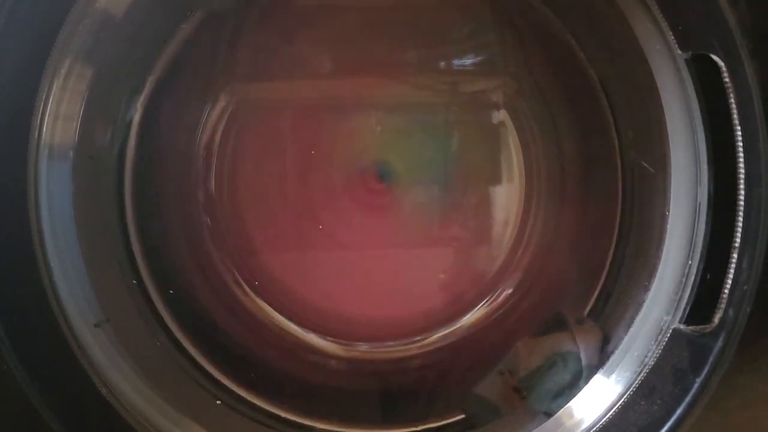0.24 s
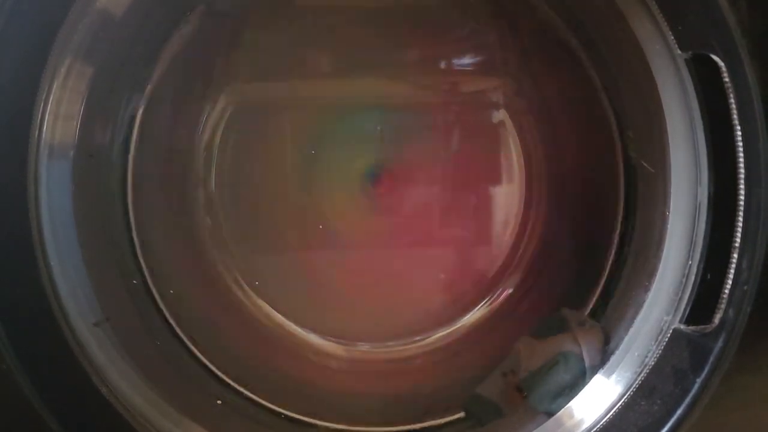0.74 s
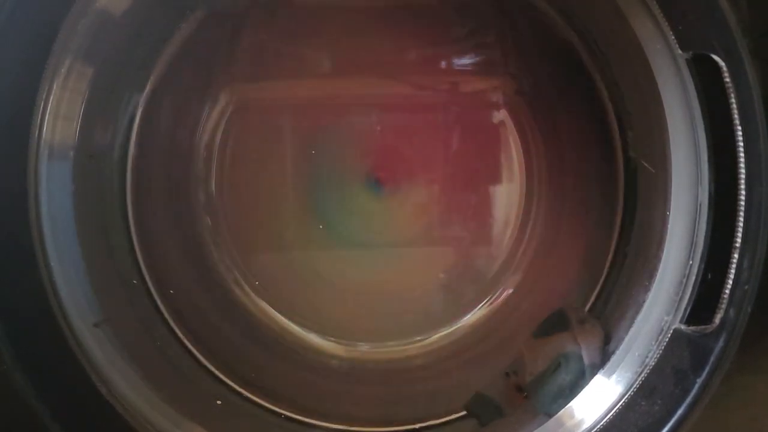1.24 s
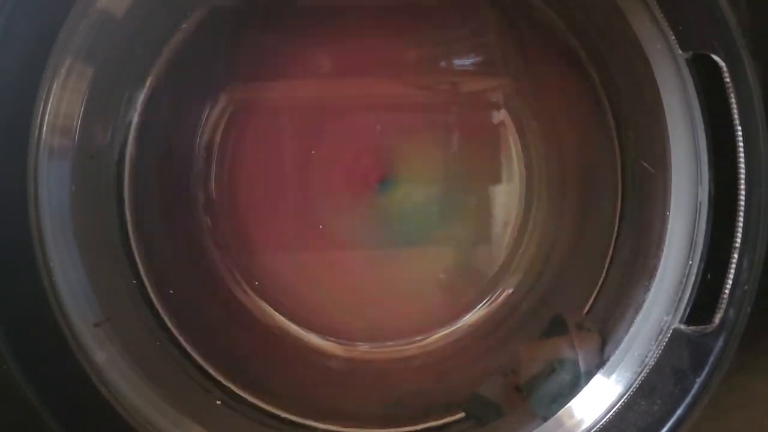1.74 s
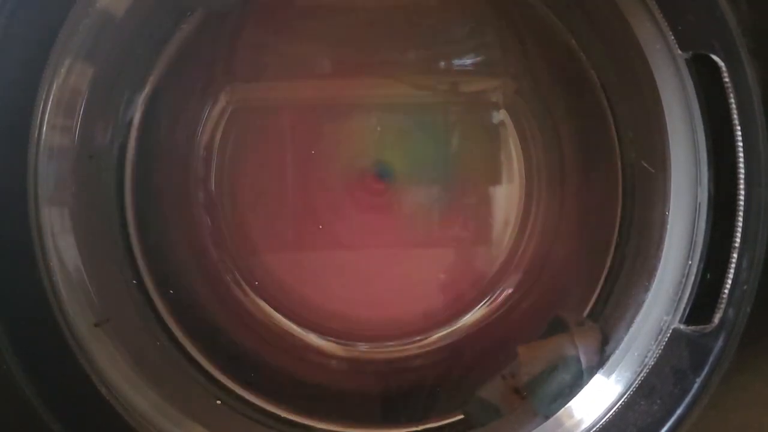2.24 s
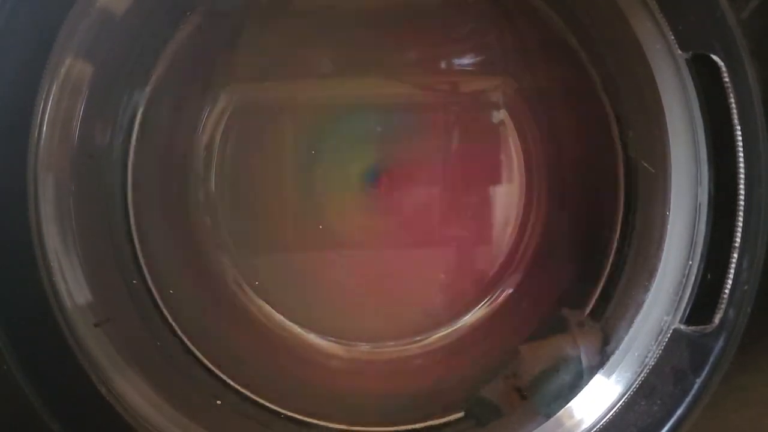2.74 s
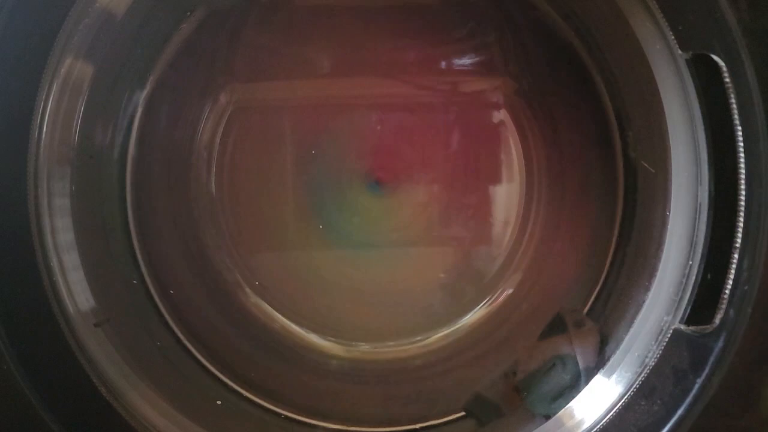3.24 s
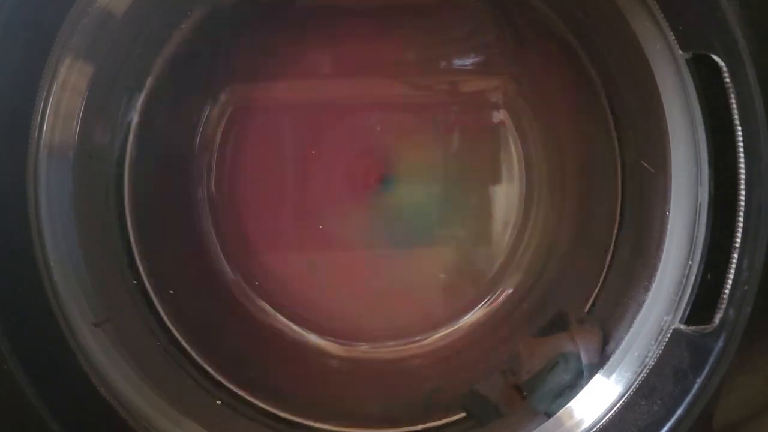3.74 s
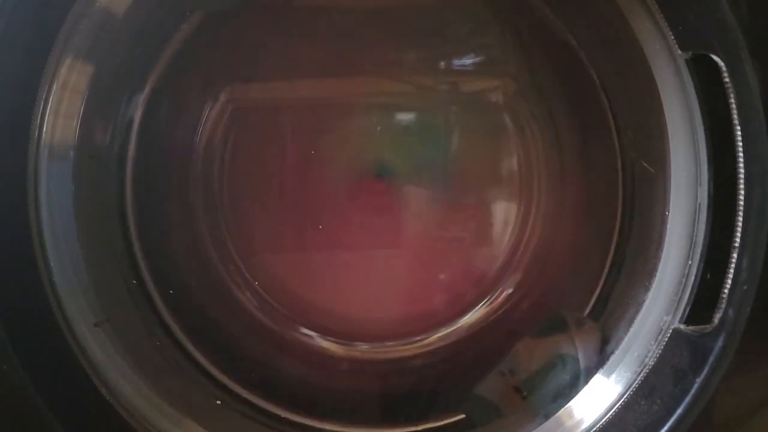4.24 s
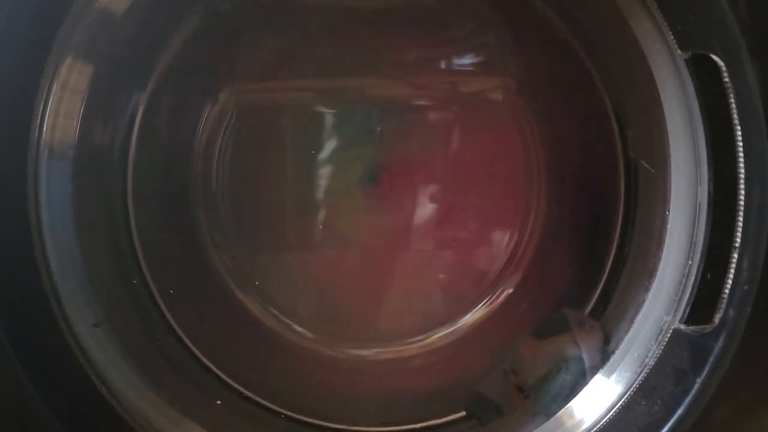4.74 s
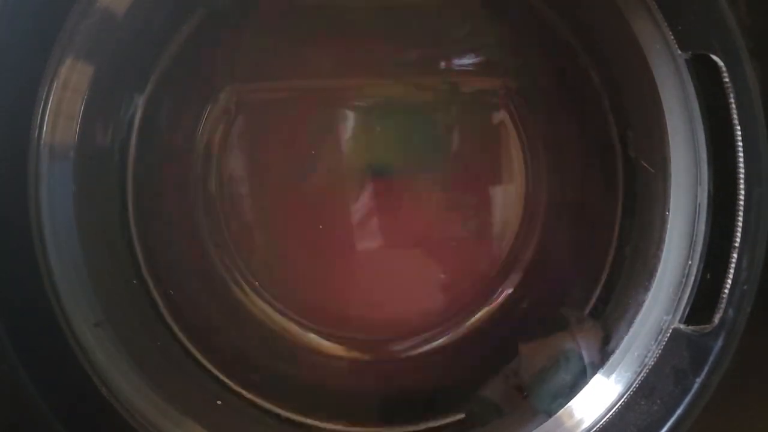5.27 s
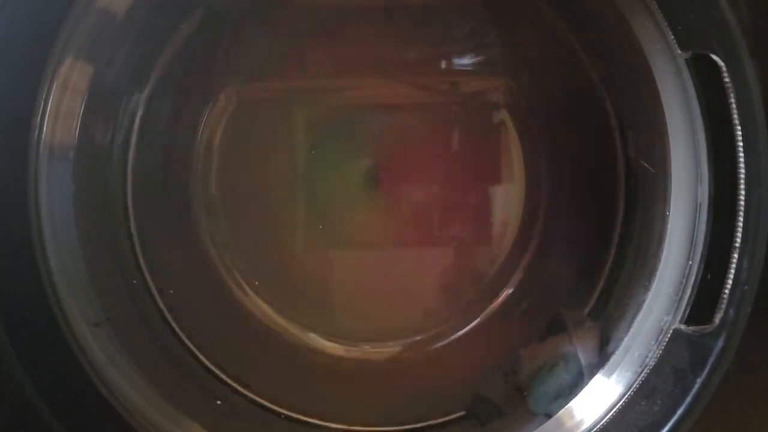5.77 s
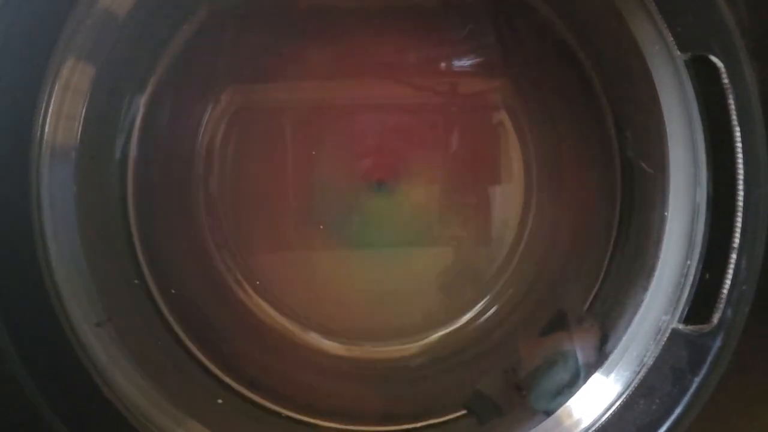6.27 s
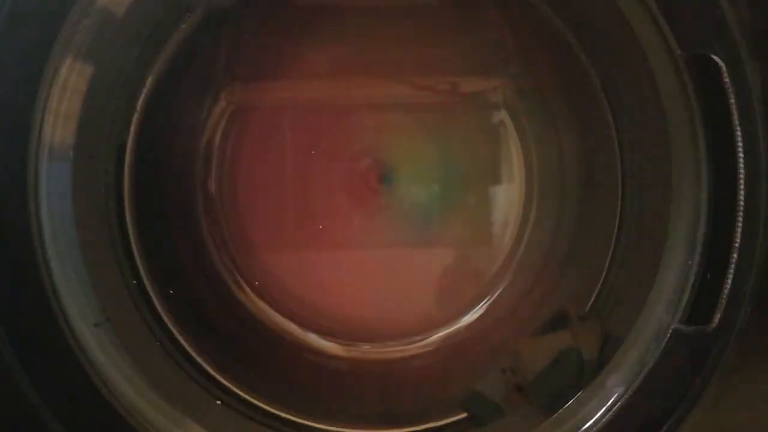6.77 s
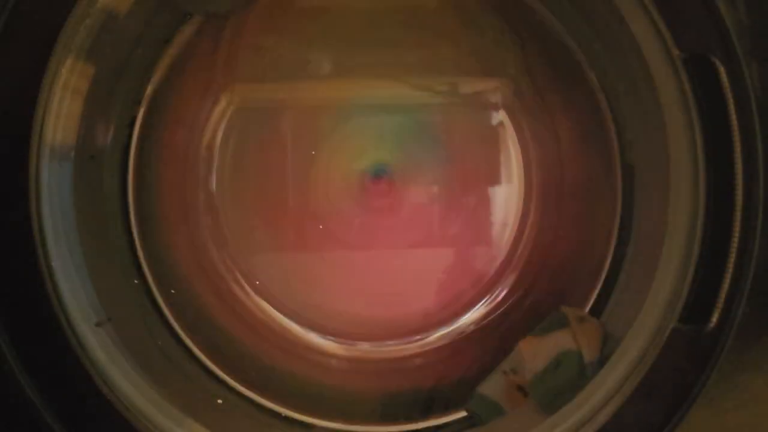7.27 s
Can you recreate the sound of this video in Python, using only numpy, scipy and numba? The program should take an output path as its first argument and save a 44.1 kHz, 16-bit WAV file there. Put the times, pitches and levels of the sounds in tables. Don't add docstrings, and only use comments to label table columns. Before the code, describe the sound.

Close steady drone of a washing machine's fast spin, a deep dominant hum with rushing tub noise, thin high whine and soft fan hiss.

```python
import sys
import numpy as np
from scipy import signal
from scipy.fft import irfft, next_fast_len
from scipy.io import wavfile
from numba import njit

SR = 44100
rng = np.random.default_rng(int(sys.argv[2]) if len(sys.argv) > 2 else 0)


def transcribe(signal):
    frames = np.atleast_2d(signal).T
    limited = np.clip(frames, -1, 1)
    pcm = np.round(limited * 32767).astype(np.int16)
    wavfile.write(sys.argv[1], SR, pcm)


def boost(x):
    u = np.asarray(x, float) / 20
    return 10 ** u


N = 331191
HOP = 128

# t/s, f/Hz
MOTOR_SPEED = [
    (0.0, 192.575),
    (1.2, 192.548),
    (2.2, 192.484),
    (3.25, 192.53),
    (3.75, 192.546),
    (4.5, 192.545),
    (5.5, 192.573),
    (7.51, 192.584),
]
# t/s, nearness level/dB
NEARNESS = [
    (0.0, 0.0),
    (1.7, 0.65),
    (2.5, 0.76),
    (3.75, 0.36),
    (4.4, 0.0),
    (5.3, -0.34),
    (6.2, -0.4),
    (7.51, -0.66),
]
# drum order [1], left level/dB, right level/dB
CABINET_ORDERS = [(1, -48.3, -50.3), (2, -39.3, -40.3), (3, -34.8, -37.2), (4, -33.7, -34.2),
                  (5, -35.6, -35.0), (6, -29.6, -31.2), (7, -12.8, -14.7), (8, -36.4, -38.2),
                  (9, -31.2, -31.4), (10, -43.9, -45.2), (11, -39.4, -42.5), (13, -40.4, -43.4),
                  (19, -40.7, -41.2), (23, -42.6, -41.2)]
# multiple [1], drum sideband [1], left level/dB, right level/dB
INNER_RACE = [(5, 0, -40, -42), (11, 0, -31, -37), (12, 1, -34, -46), (13, -2, -35, -39),
              (13, -1, -36, -40), (13, 0, -34, -29), (14, -1, -37, -41), (14, 0, -37, -36),
              (15, -1, -38, -41), (15, 0, -34, -37), (15, 1, -39, -43), (16, 0, -38, -42),
              (16, 1, -37, -46), (17, 0, -34, -41), (17, 1, -38, -35), (11, -2, -40, -46),
              (12, -1, -41, -56), (21, 0, -44, -50), (21, 1, -45, -47), (22, 1, -45, -46)]
# multiple [1], drum sideband [1], left level/dB, right level/dB
OUTER_RACE = [(17, -2, -38, -43), (17, 2, -37, -48), (18, 1, -41, -42), (20, -2, -36, -50),
              (20, 0, -43, -39), (22, -1, -34, -32), (22, 0, -45, -34), (25, -2, -39, -40),
              (25, 0, -33, -40), (30, -2, -44, -42), (30, 0, -41, -48), (31, -1, -43, -41),
              (31, 0, -38, -42), (33, -1, -44, -45)]
# f/Hz, left level/dB, right level/dB
STEADY_TONES = [(200.0, -44, -46), (300.0, -47, -51), (350.0, -47, -46), (358.0, -45, -46),
                (450.0, -47, -49), (776.0, -44, -45), (792.5, -44, -46), (835.5, -41, -48),
                (852.0, -39, -41), (890.0, -33, -34), (911.5, -47, -41), (1091.0, -40, -38),
                (1150.5, -44, -40), (1262.5, -47, -41)]
# motor order [1], left level/dB, right level/dB
SHAFT_ORDERS = [(15, -48, -49), (18, -40, -39), (20, -45, -51), (22, -49, -61), (26, -50, -59),
                (32, -53, -60), (33, -51, -55), (34, -46, -56), (35, -52, -57), (36, -37, -41),
                (37, -46, -52), (38, -52, -46), (39, -52, -56), (40, -53, -56), (41, -51, -50),
                (44, -49, -55), (54, -42, -36), (55, -52, -53), (59, -53, -51), (62, -53, -51),
                (63, -50, -54), (64, -49, -57), (72, -39, -47)]
# left and right follow of nearness [dB per dB], sway level/dB, sway period [s], a sway top t/s
SLOT_SWAY = [
    (0.0, -2.0, 3.2, .93, 4.8),
    (1.2, 1.0, 1.5, 2.3, 6.2),
    (1.2, 3.0, 1.2, 1.6, 3.9),
    (1.5, 2.0, 1.5, 2.9, 6.4),
]
# lower level/dB, lower drum angle [rad], upper level/dB, upper drum angle [rad]
SLOT_SIDEBANDS = [
    [(-6, -2.0, -8, -1.5), (-16, -1.9, -11, -.1)],
    [(-16, -1.0, -7, 2.6), (-5, 1.5, -5, 2.1)],
    [(4, 2.2, 6, -.9), (-12, 2.1, -8, 2.2)],
    [(9, -2.1, 0, 2.9), (-6, -1.9, -5, .6)],
]
SLOT_PHASE_LEAD = [.8, .4, -1.5, -1.4]
# f/Hz, level/dB per Hz
ROAR_SPECTRUM = [(5, -95), (22, -79), (45, -67), (110, -61), (220, -64.5), (350, -59.5), (550, -65),
                 (800, -57), (1200, -55), (1520, -60), (1600, -60.5), (2050, -64), (2400, -68.5),
                 (3300, -68.5), (4200, -83)]
# f/Hz, level/dB per Hz
HISS_SPECTRUM = [(3000, -109), (4200, -77), (5000, -78), (6500, -81), (7000, -75.5), (8000, -83),
                 (9500, -83), (10400, -81), (11000, -80), (13000, -81), (14000, -84), (14600, -82),
                 (16000, -80)]
# f/Hz, width [Hz], level/dB per Hz, left minus right level/dB
TUB_RESONANCES = [(268.5, 25, -56, -0.5), (445, 22, -54.5, -1), (616.6, 46, -57, 0),
                  (973.7, 32, -44.5, 7.5), (1044, 65, -55, -12.5), (1134, 67, -51, 7),
                  (1303, 54, -48.5, -1), (1414, 22, -59.5, 20), (1494, 46, -48.5, -1), (1848, 85, -58, 10),
                  (1970, 24, -55, -2), (2182, 130, -57.5, -1.5), (2548, 52, -60, 7), (2910, 43, -67, 2)]
# f/Hz, correlation [1]
PORT_LIKENESS = [(60, 0.68), (200, 0.87), (400, 0.92), (800, 0.48), (1500, 0.91), (3000, 0.35),
                 (8000, 0.23)]
# f/Hz, level/dB
PORT_LEAN = [(60, -1), (400, 4), (1000, 1.5), (3000, 1.8), (5000, 0), (8500, 14), (10500, -6), (12000, 5),
             (15000, 14)]

BELT_RATIO, START_ANGLE = 11.6555, -.263
BALLS, INNER_PER_TURN = 9, 5.3718
EDGE_HZ, RIGHT_LAG = 15725, 3
HUM_FOLLOW, ROAR_FOLLOW, HISS_FOLLOW, THROB_FOLLOW = 0.64, 0.68, 1.7, 1.8
BEAT_DB, BEAT_S, BEAT_TOP_S = 0.33, 1.07, .7
SHADE_S, SHADE_WIDTH_S, SHADE_DB = 4.85, .4, -1.4
HISS_SWELL_S, HISS_SWELL_WIDTH_S, HISS_SWELL_DB = 5.5, .35, 1
DRUM_DB, DRUM_FALL_DB, DRUM_SCATTER_DB = -44, -.45, 2.5
FAINT_DB, FAINT_SCATTER_DB = -49, 2.0
SHAFT_DB, SHAFT_FALL_DB, SHAFT_SCATTER_DB = (-54.5, -57.5), -.05, 2.5
TREMBLE_HZ, TREMBLE_S, TREMBLE_GROW_S = 3.2, 3.2, .6
CALM, SHAKEN = .06, .24


def read(points, hz):
    f, value = np.transpose(points)
    return np.interp(np.log(hz + 1), np.log(f + 1), value)


def nearness(t):
    return np.interp(t, *np.transpose(NEARNESS))


def tub_load(t):
    shade_db = SHADE_DB * np.exp(-((t - SHADE_S) / SHADE_WIDTH_S) ** 2)
    return boost(ROAR_FOLLOW * nearness(t) + shade_db)


def wander(count, width_hz):
    frames = N // HOP + 2
    z = rng.standard_normal((count, 2, frames)) + 1j * rng.standard_normal((count, 2, frames))
    hz = np.fft.fftfreq(frames, HOP / SR)
    z = np.fft.ifft(np.fft.fft(z) / (1 + (hz / width_hz) ** 2))
    return z / np.sqrt(np.mean(abs(z) ** 2, -1, keepdims=True))


@njit
def tones(angle, size, hop):
    out = np.zeros((2, hop * angle.shape[1]))
    for k in range(angle.shape[0]):
        for f in range(angle.shape[1] - 1):
            now = np.exp(1j * angle[k, f])
            step = np.exp(1j * (angle[k, f + 1] - angle[k, f]) / hop)
            for i in range(hop):
                for c in range(2):
                    change = size[k, c, f + 1] - size[k, c, f]
                    out[c, f * hop + i] += (now * (size[k, c, f] + change * i / hop)).real
                now *= step
    return out


def sing(angle, db, shape):
    return tones(angle, np.sqrt(2) * boost(db)[:, :, None] * shape, HOP)[:, :N]


def unsteady(hz, share, width_hz, spread=2.5):
    apart = np.minimum(hz / 900, spread)[:, None, None] * rng.standard_normal((len(hz), 2, 1))
    path = np.exp(1j * (2 * np.pi * rng.random((len(hz), 1, 1)) + apart))
    share = np.clip(share, 0, 1)
    return path * (np.sqrt(1 - share) + np.sqrt(share) * wander(count=len(hz), width_hz=width_hz))


def orders(first, last, strong, rule_db, scatter_db):
    order = np.arange(first, last + 1.)
    db = rule_db(order) + scatter_db * np.clip(rng.standard_normal((len(order), 2)), -2, 1)
    for k, *ports in strong:
        db[order == k] = ports
    return order, *db.T


def noise(power, hz):
    a, b, c, d = rng.standard_normal((len(hz), 4)).T
    same = np.clip(read(PORT_LIKENESS, hz), -1, 1)
    left = a + 1j * b
    right = same * left + np.sqrt(1 - same ** 2) * (c + 1j * d)
    size = 2 * len(hz) - 2
    return irfft(np.array([left, right]) * np.sqrt(power * SR * size / 4), size)[:, :N]


def tub_roar(t, drum):
    hz = np.fft.rfftfreq(next_fast_len(N // 2 + 1) * 2, 1 / SR)
    time = np.arange(N) / SR
    drum_angle = np.interp(time, t, drum)
    lean = boost(np.outer([.5, -.5], read(PORT_LEAN, hz))) ** 2

    high_fall_db = 40 * np.log2(np.maximum(hz / 4200, 1))
    body = boost(read(ROAR_SPECTRUM, hz) - high_fall_db) ** 2 * lean
    for f, width, db, lean_db in TUB_RESONANCES:
        peak = boost(db + np.array([[.5], [-.5]]) * lean_db) ** 2
        body = body + peak / (1 + (2 * (hz - f) / width) ** 2) ** 2
    roar = noise(body, hz) * tub_load(time) * (1 + .1 * np.cos(drum_angle - 2.1))

    air = boost(read(HISS_SPECTRUM, hz)) ** 2 * lean * (hz > 3000)
    hiss = noise(air, hz) * (1 + 0.076 * np.cos(drum_angle + 3.0))
    gusts_db = 1.2 * wander(count=1, width_hz=4.5)[0].real
    swell_db = HISS_SWELL_DB * np.exp(-((t - HISS_SWELL_S) / HISS_SWELL_WIDTH_S) ** 2)
    gusts_db = gusts_db + HISS_FOLLOW * nearness(t) + swell_db
    hiss = hiss * boost([np.interp(time, t, g) for g in gusts_db])
    return boost(2.5) * roar + boost(0.5) * hiss


def bearings(t, drum):
    rows = np.array(INNER_RACE + OUTER_RACE, float)
    per_turn = np.repeat([INNER_PER_TURN, BALLS - INNER_PER_TURN], [len(INNER_RACE), len(OUTER_RACE)])
    faint = rows - [0.031, 2, 0, 0]
    faint[:, 2:] = FAINT_DB + FAINT_SCATTER_DB * rng.standard_normal((len(rows), 2))
    rows, per_turn = np.vstack([rows, faint]), np.tile(per_turn, 2)
    passes = (rows[:, 0] * per_turn + rows[:, 1])[:, None] * drum
    steady = np.array(STEADY_TONES)
    angle = np.vstack([passes, 2 * np.pi * steady[:, :1] * t])
    db = np.vstack([rows[:, 2:], steady[:, 1:]])
    hz = (angle[:, -1] - angle[:, 0]) / (2 * np.pi * t[-1])
    return sing(angle, db, tub_load(t) * unsteady(hz, share=.2, width_hz=.9, spread=.6))


def motor_whine(t, motor, drum):
    def rule_db(k):
        return np.add(SHAFT_DB, SHAFT_FALL_DB * (k[:, None] - 14))

    order, *db = orders(14, 81, SHAFT_ORDERS, rule_db, SHAFT_SCATTER_DB)
    full_hz = MOTOR_SPEED[0][1]
    hz, turn = order * full_hz, np.exp(1j * drum)
    chance = np.exp(2j * np.pi * rng.random((6, len(order), 2, 1)))
    swing = (.011 * order)[:, None, None]
    near = swing * (chance[0] / turn + chance[1] * turn)
    far = 0.26 * swing * (chance[2] / turn ** 2 + chance[3] * turn ** 2)
    far = far + 0.13 * swing * (chance[4] / turn ** 3 + chance[5] * turn ** 3)

    swell = np.ones(near.shape, complex)
    tremble = CALM + (SHAKEN - CALM) / (1 + np.exp((TREMBLE_S - t) / TREMBLE_GROW_S))
    slots = zip((18, 36, 54, 72), SLOT_SWAY, SLOT_SIDEBANDS, SLOT_PHASE_LEAD)
    for k, (*follow, sway_db, period, top), ports, lead in slots:
        sway = sway_db * tremble / SHAKEN * np.cos(2 * np.pi * (t - top) / period)
        level_db = np.outer(follow, nearness(t)) + sway
        below_db, below, above_db, above = np.transpose(ports)[:, :, None]
        lower = boost(below_db) * np.exp(1j * below) / turn
        upper = boost(above_db) * np.exp(1j * above) * turn
        near[order == k] = lower + upper
        lag_phase = 2 * np.pi * k * full_hz * RIGHT_LAG / SR
        swell[order == k] = boost(level_db) * np.exp(1j * np.array([[lead], [lag_phase]]))

    depth = boost(THROB_FOLLOW * nearness(t)) * (.95 + .25 * wander(count=len(hz), width_hz=1.5))
    throb = 1 + (near + far) * depth
    throb = throb / np.sqrt(np.mean(abs(throb) ** 2, -1, keepdims=True))
    flutter = (wander(count=len(hz), width_hz=1.) * np.exp(2j * np.pi * TREMBLE_HZ * t)).real
    swell = swell * (1 + tremble * flutter)
    is_slot = order % 18 == 0
    share = .06 - .045 * is_slot[:, None, None]
    paths = unsteady(hz, share=share, width_hz=2.5, spread=1.3 * ~is_slot)
    return sing(order[:, None] * motor, np.transpose(db), throb * swell * paths)


def drum_hum(t, drum):
    def rule_db(k):
        return DRUM_DB + DRUM_FALL_DB * (k[:, None] - 12) - [0, 1.8]

    order, *db = orders(1, 32, CABINET_ORDERS, rule_db, DRUM_SCATTER_DB)
    below = np.maximum(6 - order, 0)
    floor_mode = 3.7 / (1 + np.exp((2.15 - below) / .3))
    shift = .75 * np.maximum(order - 8.5, 0) - 1.05 * below - floor_mode
    shift = shift + 2 * np.pi * rng.random(len(order)) * (order > 13)
    depth = np.minimum(0.0011 * order ** 2, .6)[:, None, None]
    shape = 1 + depth * wander(count=len(order), width_hz=2.0)[:, :1]
    shape = np.repeat(shape, 2, 1)
    beat_db = BEAT_DB * np.cos(2 * np.pi * (t - BEAT_TOP_S) / BEAT_S)
    shape[order == 7] = boost(HUM_FOLLOW * nearness(t) + beat_db)
    return sing(order[:, None] * drum + shift[:, None], np.transpose(db), shape)


def scene():
    t = np.arange(N // HOP + 2) * HOP / SR
    speed = np.interp(t, *np.transpose(MOTOR_SPEED))
    motor = 2 * np.pi * (np.cumsum(speed) - speed[0]) * HOP / SR
    drum = motor / BELT_RATIO + START_ANGLE
    return tub_roar(t, drum) + bearings(t, drum) + motor_whine(t, motor, drum) + drum_hum(t, drum)


def top_cut(x):
    return signal.sosfilt(signal.butter(12, 15720, fs=SR, output="sos"), x)


def record(dry):
    late = np.array([dry[0], np.roll(dry[1], RIGHT_LAG)])
    edge = signal.firwin(1023, EDGE_HZ, window=("kaiser", 9), fs=SR)
    mix = signal.oaconvolve(np.clip(late, -1, 1), edge[None], "same")
    return top_cut(mix)


dry = scene()
out = record(dry)
transcribe(out)
```